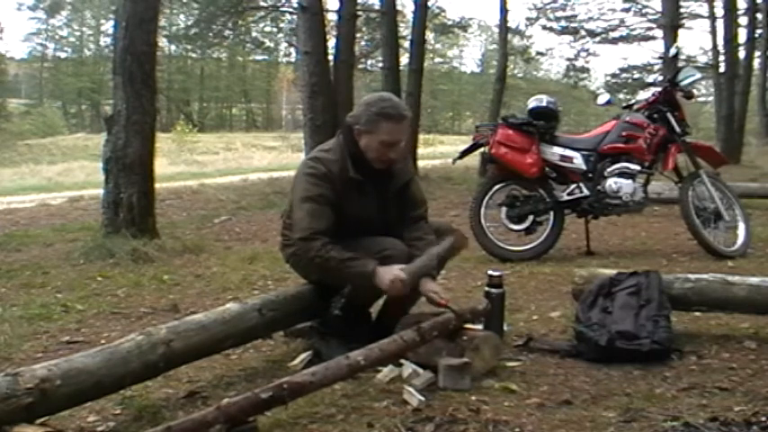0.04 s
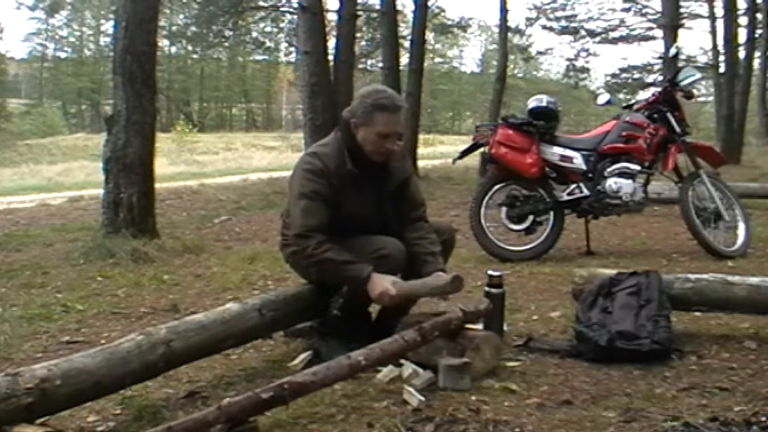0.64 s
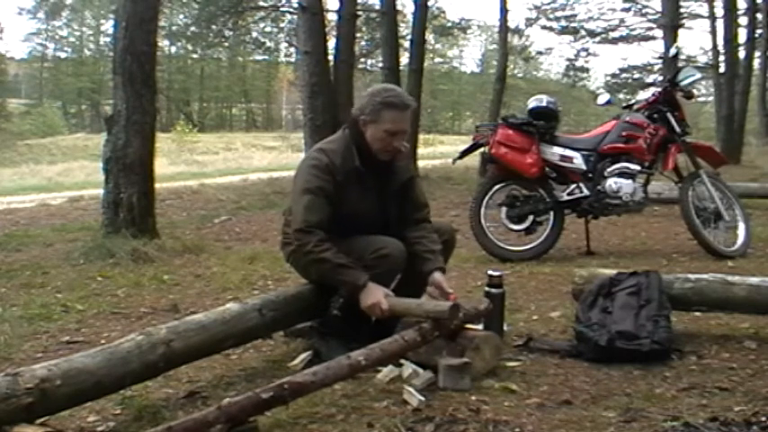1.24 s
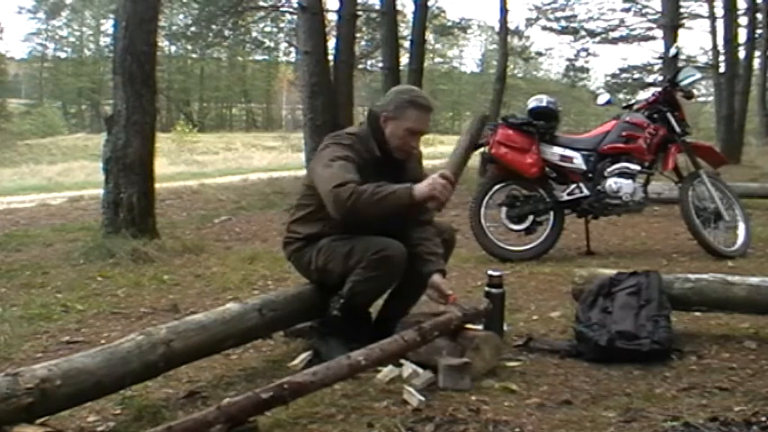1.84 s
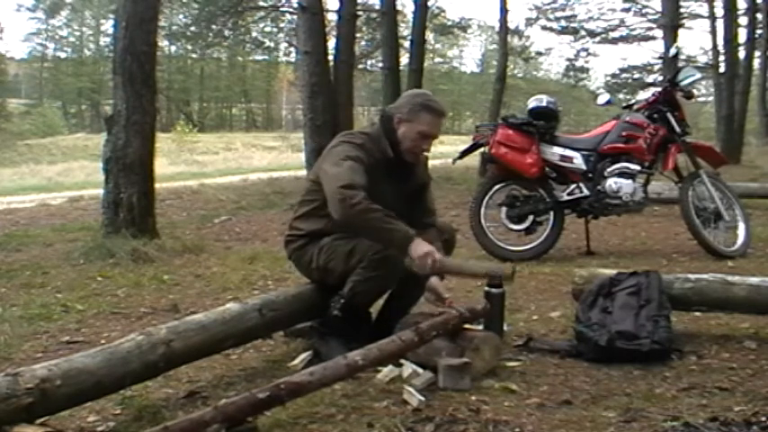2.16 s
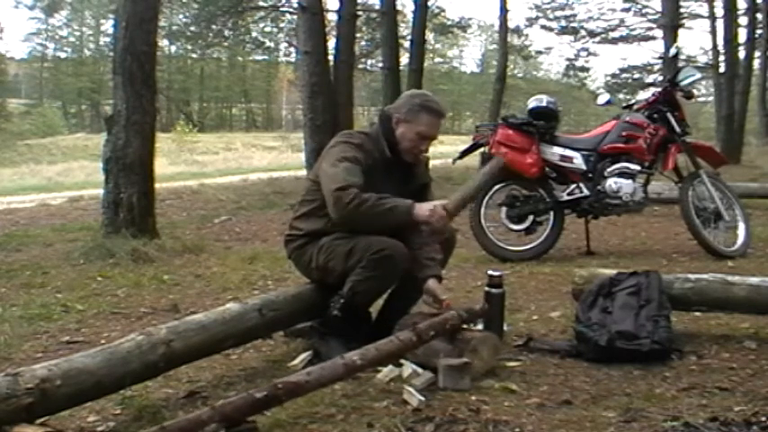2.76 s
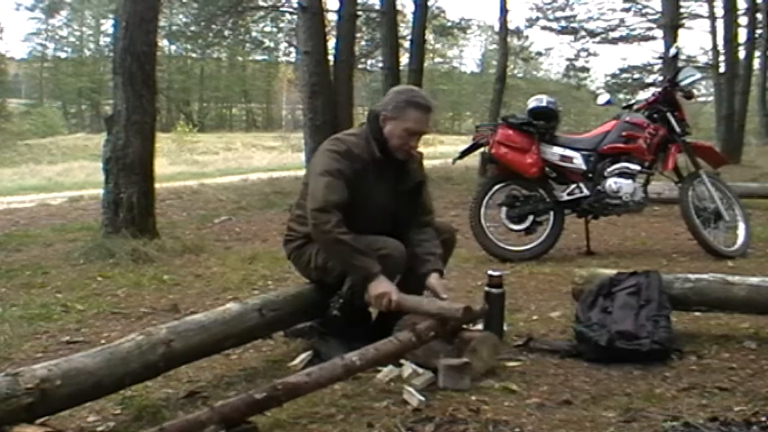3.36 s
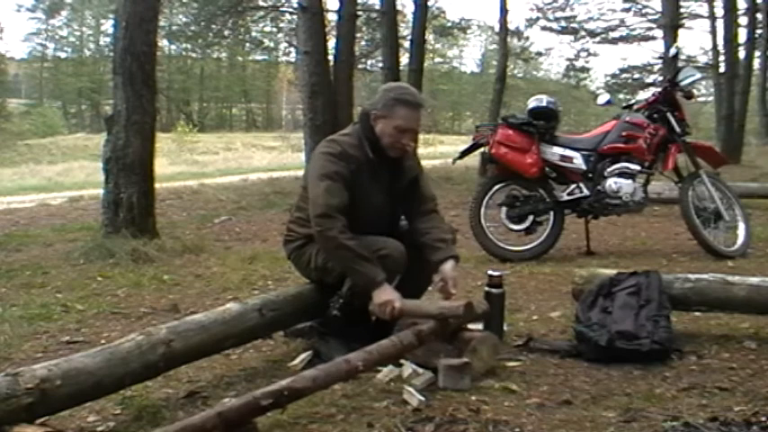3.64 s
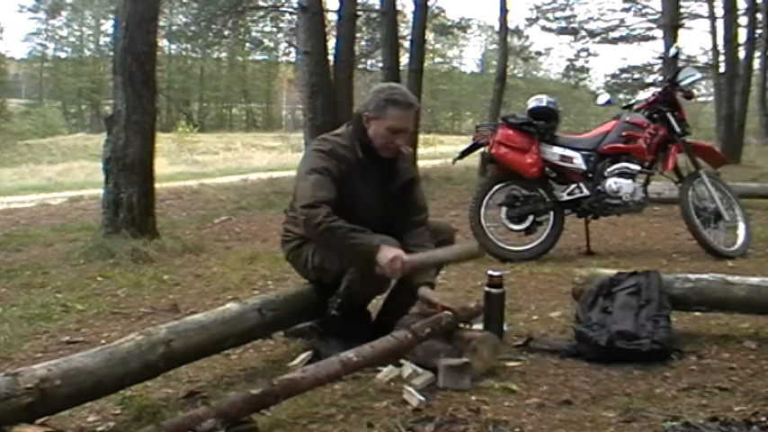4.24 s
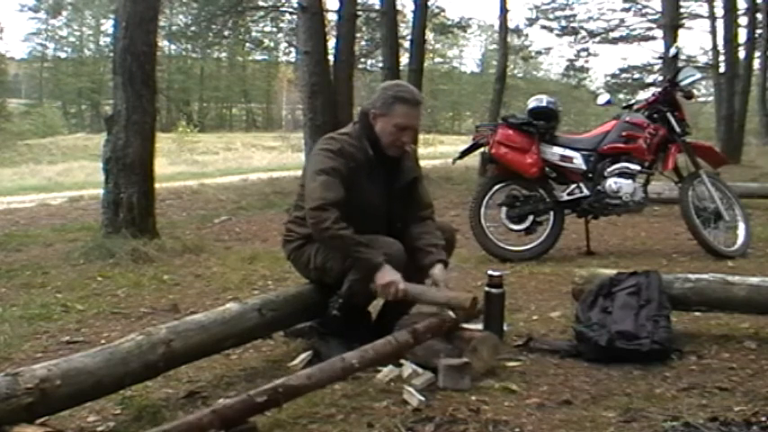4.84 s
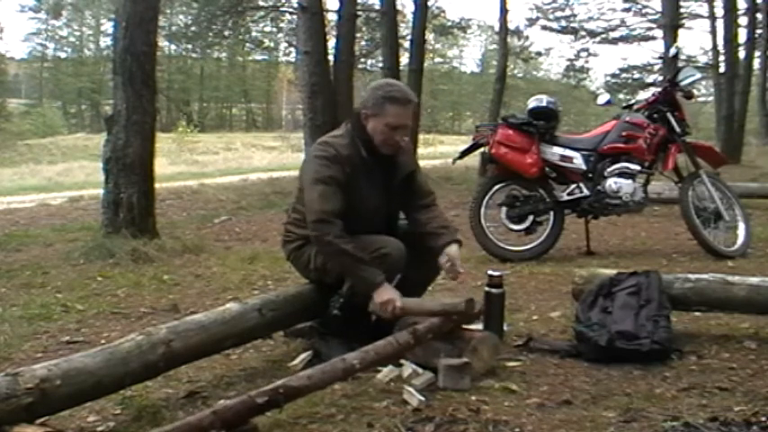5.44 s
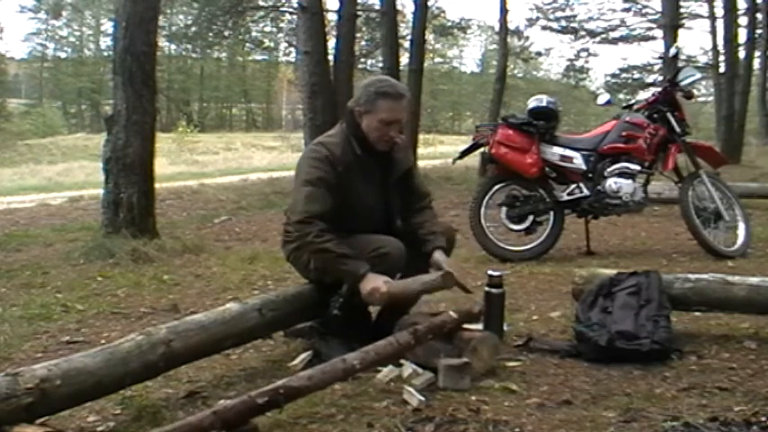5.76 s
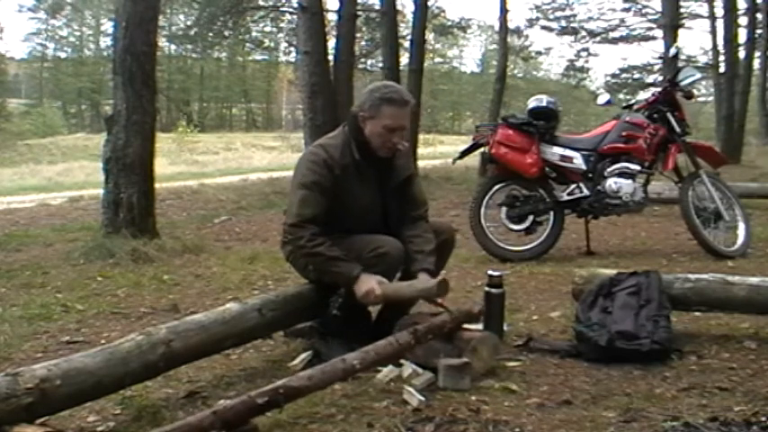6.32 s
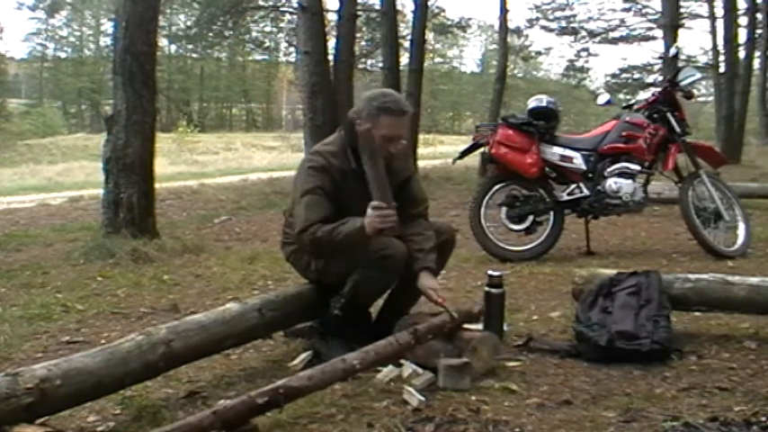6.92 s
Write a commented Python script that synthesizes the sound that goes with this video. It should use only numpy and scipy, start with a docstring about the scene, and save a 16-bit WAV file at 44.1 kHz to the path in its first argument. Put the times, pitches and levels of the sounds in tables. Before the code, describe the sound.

Close, hard knocks of wood being split outdoors, as a baton drives a knife into a pole lying on the ground. Seven unevenly spaced blows each combine a dry clack, tearing fibres, a dull thump and a short hollow ring, the hardest slightly overloading the microphone. The trees scatter each knock back. In the gaps come light aiming taps, crackling bark and faint sleeve rustle against a gentle breeze.

```python
"""Hard, woody knocks in a forest: a wooden baton drives a heavy knife into a pine pole lying on the ground.
Each blow cracks the fibres, clacks the baton, thumps the soil and rings the pole's paired bending modes;
two light taps aim the blade. The trunks scatter the knocks back over soft wind, bark crackles,
a jacket rustles, and the hard blows overload the input."""
import sys
import numpy as np
from scipy import signal
from scipy.fft import rfft, irfft, next_fast_len
from scipy.io import wavfile

SR = 44100
rng = np.random.default_rng(int(sys.argv[2]) if len(sys.argv) > 2 else 0)


def waveform_to_disk(signal):
    """Save audio, clipped to [-1, 1], as 16-bit WAV at the path in sys.argv[1]."""
    frames = np.transpose(np.atleast_2d(signal))
    scaled = np.clip(frames, -1, 1) * 32767
    samples = np.round(scaled).astype(np.int16)
    wavfile.write(sys.argv[1], SR, samples)


N = 312360
LEAD = 4410  # samples of pre-roll: the first blow is already ringing as the scene opens

# the microphone's comb-like colouring of wind and echoes: (centre [Hz], width [Hz], gain [dB])
MIC_COLOUR = [(1057, 110, -7), (1260, 42, 2.5), (1370, 110, -9.5), (2430, 80, 2.5), (2647, 29, 8),
              (2860, 120, -4.5), (4030, 59, 6.5), (4340, 45, 7.5)]
# arm movements that rustle the jacket and crackle the bark: (middle [s], level [dB], half length [s])
ARM_MOVES = [(.29, -66.5, 0.062), (1.73, -56.5, .05), (3.14, -61.5, 0.14), (3.72, -64, 0.041),
             (5.07, -62, .12), (5.53, -66.5, .13), (6.11, -65, 0.055)]


def undb(db):
    """Decibels to gain."""
    return 10 ** (np.asarray(db) / 20)


def noise(count, spectrum, tilt_db=0, humps=()):
    """Unit-level noise shaped by (frequency [Hz], level [dB]) points, a tilt per octave and humps."""
    size = next_fast_len(count, True)
    f = np.maximum(np.fft.rfftfreq(size, 1 / SR), 1)
    hz, db = np.transpose(spectrum)
    shape_db = np.interp(np.log(f), np.log(hz), db) + tilt_db * np.log2(np.maximum(f, hz[1]))
    for centre, width, hump_db in humps:
        shape_db += hump_db * np.exp(-((f - centre) / width) ** 2)
    shaped = irfft(rfft(rng.standard_normal(size)) * undb(shape_db), size)[:count]
    return shaped / shaped.std()


def stereo_noise(count, spectrum, side_db, tilt_db=0, humps=()):
    """Mid/side noise; side_db sets the width."""
    mid, side = (noise(count, spectrum, tilt_db, humps) for _ in range(2))
    return mid + undb(side_db) * side * np.array([[1], [-1]])


def attack(t, rise_s):
    """Exponential rise to full level."""
    return 1 - np.exp(-t / rise_s)


def fade(t, t60):
    """Exponential decay, 60 dB down after t60 seconds."""
    return np.exp(-np.log(1000) * t / t60)


def ring(t, hz, t60):
    """One struck mode."""
    return np.sin(2 * np.pi * hz * t) * fade(t, t60)


def swells(t, rows):
    """A smooth rise and fall of gain for each (middle [s], level [dB], half length [s])."""
    return sum(undb(db) * np.exp(-((t - s) / half_s) ** 2) for s, db, half_s in rows)


def wander(t, points):
    """A control curve gliding between evenly spaced random values."""
    return np.interp(t, np.linspace(0, t[-1], points), rng.standard_normal(points))


def add(out, s, sound):
    """Mix a sound in at scene time s, on a track that has the pre-roll."""
    start = max(LEAD + int(s * SR), 0)
    part = sound[..., :max(out.shape[1] - start, 0)]
    out[:, start:start + part.shape[-1]] += part


def wind(t, level_db=-57, swell_db=1):
    """A soft bed of wind in the crowns, slowly breathing."""
    # wind spectrum: (frequency [Hz], level [dB])
    spectrum = [(20, -26), (50, -7.5), (100, -5.5), (220, -3), (380, -1.5), (600, -7), (850, -8),
                (1200, -11), (2000, -18), (3200, -14.5), (3800, -26.5), (5000, -26.5), (11500, -30)]
    air = stereo_noise(len(t), spectrum, side_db=-4, humps=MIC_COLOUR)
    return air * undb(level_db + swell_db * wander(t, points=25))


def jacket(t, rest_db=-74.5, flutter_db=3):
    """The sleeve's fluttering rustle swells with each arm movement."""
    # rubbing cloth: (frequency [Hz], level [dB])
    spectrum = [(800, -22), (2500, -6.5), (5000, -6.5), (10000, -3), (12000, 0.5)]
    rustle = stereo_noise(len(t), spectrum, side_db=1)
    movement = undb(rest_db) + swells(t, ARM_MOVES)
    return rustle * movement * undb(flutter_db * wander(t, points=900))


def boots(t):
    """Boots shift on the soil with a low, muffled scuff."""
    # shift of the feet: (middle [s], level [dB], half length [s])
    shifts = [(3.512, -60.5, 0.099)]
    spectrum = [(30, -13), (80, 8), (160, -19), (500, -37)]  # (frequency [Hz], level [dB])
    return stereo_noise(len(t), spectrum, side_db=-2, tilt_db=-1) * swells(t, shifts)


def trunk_echo(near_t60=0.51, far_t60=4.1, far_db=-24, clump_db=2):
    """Trunks scatter a knock back in uneven clumps: near ones strongly, far ones in a faint tail."""
    # tone of the echo: (frequency [Hz], level [dB])
    spectrum = [(100, -13), (450, -16.5), (800, -6.5), (1250, -4), (2000, -10.5), (3200, -11.5),
                (3900, -33), (6000, -32.5), (11000, -34)]
    t = np.arange(SR * 3 // 2) / SR
    clumps = np.interp(t, t[::256], rng.standard_normal(len(t[::256])))
    envelope = (fade(t, near_t60) + undb(far_db) * fade(t, far_t60)) * attack(t, 0.0025)
    scatter = stereo_noise(len(t), spectrum, side_db=-10.5, humps=MIC_COLOUR)
    return scatter * envelope * undb(clump_db * clumps)


def forest_reverb(x, wet_db=-32):
    """The close sounds linger faintly among the trees."""
    echo = trunk_echo()
    impulse = undb(wet_db) * echo / np.linalg.norm(echo[0])
    return signal.oaconvolve(x.mean(axis=0)[None], impulse, axes=1)[:, :x.shape[1]]


def early_reflections(x, side_db=-17, t60=0.029):
    """Logs and ground close by reflect differently to left and right, widening the image."""
    t = np.arange(SR // 32) / SR
    scatter = rng.standard_normal(len(t)) * fade(t, t60)
    side = signal.fftconvolve(x.mean(axis=0), scatter / np.linalg.norm(scatter))[:x.shape[1]]
    return undb(side_db) * side * np.array([[1], [-1]])


def bark_snaps(above_move_db=9, spread_db=4.5, per_move=4):
    """Short, dry snaps of bark and splinters: a few clear ones, and faint ones in each arm movement."""
    # snapping bark: (frequency [Hz], level [dB])
    spectrum = [(300, -33), (900, -18), (1500, 2), (3500, 3), (5000, -9.5), (9000, -2), (12000, -6)]
    # clear snaps under the blade: (time [s], level [dB], brightness [dB per octave])
    clear = [(0.45, -45.5, -2), (1.928, -45.5, -2.5), (2.937, -32, 4), (2.993, -43.5, 0),
             (3.198, -44.5, -1.5), (3.5306, -42.5, -0.5), (3.597, -45, 2), (4.312, -42, 1.5),
             (4.463, -35.5, -7.5), (4.4725, -33.5, -3), (6.9726, -36.5, -6.5)]
    out, t = np.zeros((2, N + LEAD)), np.arange(SR // 4) / SR
    faint = []
    for middle_s, move_db, half_s in ARM_MOVES:
        for when, size in rng.uniform(-1, 1, (per_move, 2)):
            faint.append((middle_s + half_s * when, move_db + above_move_db + spread_db * size, 0))
    for s, db, bright_db in clear + faint:
        burst = stereo_noise(len(t), spectrum, side_db=-11.5, tilt_db=bright_db)
        add(out, s, undb(db) * burst * fade(t, t60=0.024) * attack(t, 0.0005))
    return out


def soil_thump(t):
    """The soil shudders under the pole."""
    # dull thud of earth: (frequency [Hz], level [dB])
    spectrum = [(30, -32.5), (60, -19.5), (95, 5), (150, -3), (205, 6.5), (400, -3.5), (700, -10.5),
                (1200, -22.5), (3000, -60)]
    return stereo_noise(len(t), spectrum, side_db=-15) * fade(t, t60=0.31) * attack(t, 0.00067)


def fibre_crack(t, length_s, splinter_db=-24):
    """Fibres tear while the blade jumps forward and stop when it jams; a few splinters follow."""
    # tearing wood: (frequency [Hz], level [dB])
    spectrum = [(150, -15), (600, -3), (1500, 2.5), (2500, -3), (4300, -3.5), (6500, -11.5), (9000, -15.5),
                (11500, -20)]
    tearing = np.exp(-(t / length_s) ** 2)
    splinters = undb(splinter_db) * fade(t, t60=0.017)
    return stereo_noise(len(t), spectrum, side_db=-15) * (tearing + splinters) * attack(t, 0.0003)


def baton_clack(t, clack_hz, decay_cycles=36, detune=0.008):
    """A dead clack, pitched by where the baton meets the knife's spine; a lower one lasts longer."""
    # hand-damped baton and wedged blade: (frequency [Hz], t60 [s], level [dB])
    modes = [(570, 0.067, -12.5), (806, 0.089, -14.5), (977, 0.038, -10), (1235.5, 0.051, -12),
             (1623, 0.039, -11.5), (2281, 0.026, -8), (1235, 0.23, -30), (2697, 0.27, -36.5),
             (3170, .25, -42), (4380, 0.22, -52.5)]
    tuning = 1 + detune * rng.standard_normal(len(modes))
    body = sum((-1) ** k * undb(db) * ring(t, hz * tuning[k], t60)
               for k, (hz, t60, db) in enumerate(modes))
    clack = ring(t, clack_hz, decay_cycles / clack_hz)
    return (body - clack) * attack(t, 0.00086)


def pole_ring(t, colour, angle_deg, colour_hz=400, power_floor=0.03, swell_cycles=0.95, detune=0.0006):
    """The pole rings: colour sets its loudest pitches, the blade angle shares the force in each pair."""
    # bending modes, paired because the pole is not round: (frequency [Hz], t60 [s], level [dB])
    modes = [(264.7, 0.48, -22), (286.2, 0.27, -19), (413.9, .25, 0.5), (446.7, .27, -9),
             (592.4, .17, -1.5), (636.4, .17, -9.5), (795, 0.14, -11.5), (836, .14, -15)]
    tuning = 1 + detune * rng.standard_normal(len(modes))
    angle = np.radians(angle_deg)
    planes = np.cos(angle), -np.sin(angle)  # partners start opposed, then beat
    out = 0
    for k, (hz, t60, db) in enumerate(modes):
        emphasis = np.cos(2 * np.pi * colour * np.sqrt(hz / colour_hz)) ** 2
        drive = planes[k % 2] * np.sqrt(power_floor + emphasis)
        swell = attack(t, swell_cycles / hz)  # bending waves take a few cycles to fill the pole
        out = out + drive * undb(db) * ring(t, hz * tuning[k], t60) * swell
    return out


def knocks(crack_db=-6, soil_db=-26.5, echo_db=-36, left_db=1.7):
    """Each blow layers soil, thud, baton, crack, pole and echo; the blade sits a little to the left."""
    # blows and aiming taps: (time [s], force [dB], pole ring [dB], ring colour [unitless],
    # blade angle [degrees], clack pitch [Hz], crack length [s], overload thud [dB])
    blows = [(-.045, 0.5, 8, 0.3, 56, 1330, 0.0038, -26),
             (1.6663, -3, -6.5, 1.778, 60, 1754, 0.0039, -19.5),
             (2.1301, -1, 1.2, 3.088, 72, 1180, .0053, -5),
             (2.5520, 2.5, -1.5, 0.88, 59, 1709, 0.006, -21.5),
             (2.937, -34.5, -24, 0.935, 38, 804, 0.0026, -32),
             (4.0852, -5.5, 1, 1.622, 59, 1220, 0.0051, -16),
             (4.4699, -34.5, -22, 0.54, 59, 790, 0.0041, -26.5),
             (4.9234, -3.5, 8.5, 2.722, 41.3, 775, .011, -11),
             (6.6685, 0, -11, 3.11, 44, 1435, 0.0055, -11)]
    soil_growth, echo_growth = 0.26, 0.93  # dB per dB of force
    jam_share = 0.3  # the pole takes the blow when the blade jams, this far into the crack
    out, t = np.zeros((2, N + LEAD)), np.arange(SR // 2) / SR
    pan = undb(np.array([[left_db], [-left_db]]) / 2)
    for s, force_db, ring_db, colour, angle_deg, clack_hz, crack_s, thud_db in blows:
        thump = undb(soil_db + soil_growth * force_db) * soil_thump(t)
        thud = undb(thud_db) * ring(t, hz=175, t60=0.018)  # a short low thud with every blow and tap, as of an overloaded input
        blade = undb(force_db) * (baton_clack(t, clack_hz) + undb(crack_db) * fibre_crack(t, crack_s))
        add(out, s, thump + thud + pan * blade)
        add(out, s + jam_share * crack_s, undb(ring_db) * pole_ring(t, colour, angle_deg))
        add(out, s, undb(echo_db + echo_growth * force_db) * trunk_echo())
    return out


def scene(low_cut_hz=75):
    """The woodwork in front, the forest all around; a thin pole radiates little deep bass."""
    t = np.arange(N) / SR
    low_cut = signal.butter(2, low_cut_hz, "high", fs=SR, output="sos")
    work = signal.sosfilt(low_cut, knocks() + bark_snaps())
    in_forest = work + early_reflections(work) + forest_reverb(work)
    return in_forest[:, LEAD:] + wind(t) + jacket(t) + boots(t)


def record(dry, ceiling=0.94, band_hz=11750, top_hz=15500):
    """The input flattens the hardest peaks and loses the top; overshoots are clipped, then smoothed."""
    squashed = dry / (1 + (dry / ceiling) ** 4) ** (1 / 4)
    darkened = signal.sosfilt(signal.ellip(10, 0.2, 60, band_hz, fs=SR, output="sos"), squashed)
    clipped = np.clip(darkened, -1, 1)
    return signal.sosfilt(signal.ellip(8, 0.2, 60, top_hz, fs=SR, output="sos"), clipped)


dry = scene()
out = record(dry)
waveform_to_disk(out)
```